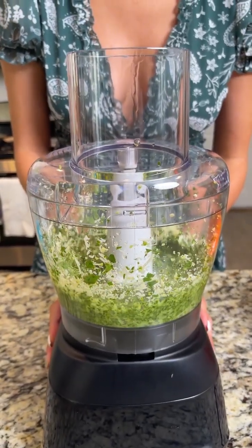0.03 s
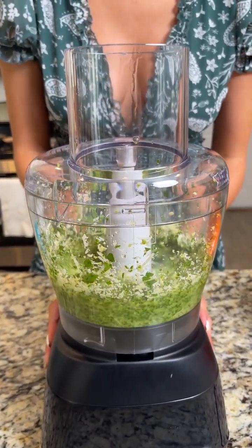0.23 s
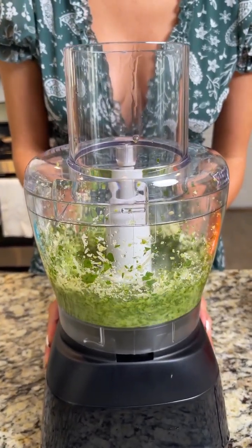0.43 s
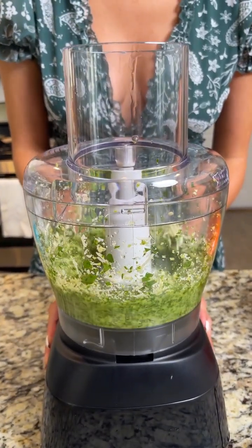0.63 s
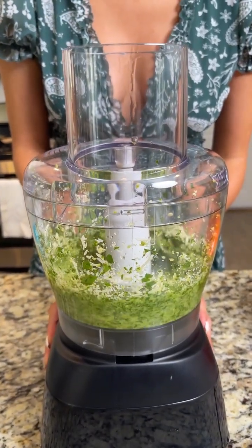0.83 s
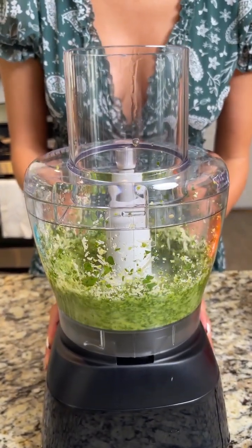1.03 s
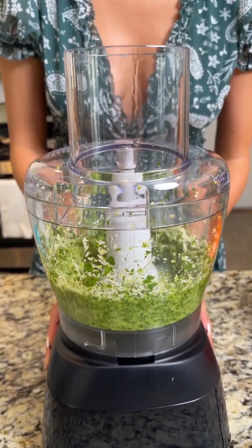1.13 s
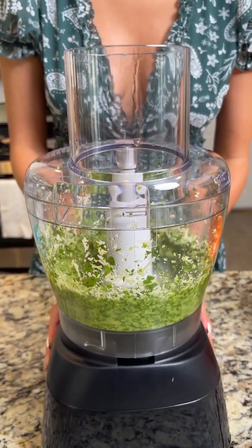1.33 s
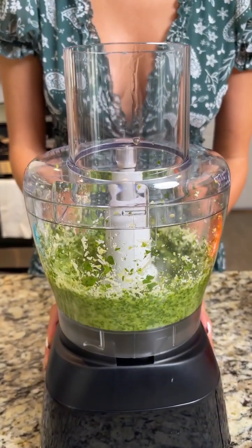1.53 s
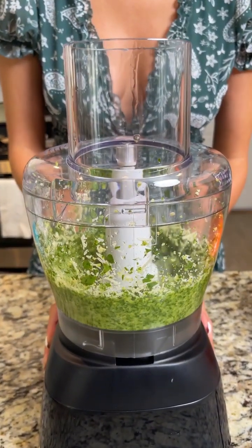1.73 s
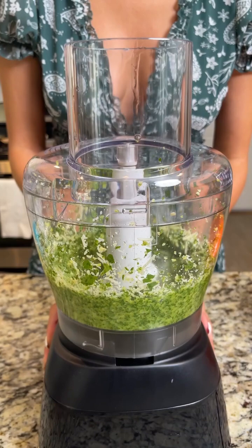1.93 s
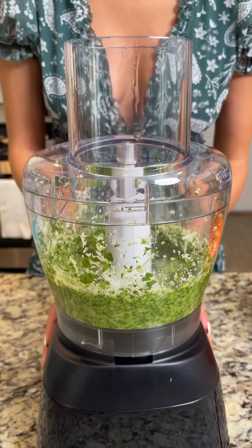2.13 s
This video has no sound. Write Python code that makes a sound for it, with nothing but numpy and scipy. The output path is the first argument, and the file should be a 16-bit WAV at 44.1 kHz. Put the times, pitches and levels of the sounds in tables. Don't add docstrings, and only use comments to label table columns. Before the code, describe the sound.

A food processor, heard close in stereo in a quiet kitchen. The tail of an earlier pulse fades until 0.15 s, when the motor kicks in with a surging hum. Its tone climbs until about 0.7 s amid plastic rattle, gear whine, airy hiss and bowl ringing, with a bright spatter near 0.33 s. Power cuts around 1.1 s; the pitch slides down, the base hums near 1.5 s, and herbs tick softly until about 2 s.

```python
import sys
import numpy as np
from scipy import signal
from scipy.fft import rfft, irfft
from scipy.io import wavfile
from scipy.ndimage import uniform_filter1d

SR = 44100
rng = np.random.default_rng(int(sys.argv[2]) if len(sys.argv) > 2 else 0)


def master(y):
    cut = np.clip(np.atleast_2d(y).T, -1, 1)
    pcm = np.round(cut * 32767)
    wavfile.write(sys.argv[1], SR, pcm.astype(np.int16))


def gain_from_db(level_db):
    decades = np.asarray(level_db, float) / 20
    return 10 ** decades


N = 97020
T = np.arange(N) / SR
HZ = np.arange(N + 1) * SR / (2 * N) + 1e-3
ON_S, OFF_S = .157, 1.12

# t/s, turns per second/Hz, level/dB
SHAFT_RUN = [(.27, 196, -36), (.31, 206, -22), (.348, 220, -31), (.385, 238, -22), (.43, 255, -30),
             (.5, 277, -28), (.575, 292, -29), (.6, 295, -40), (.63, 298, -33), (.66, 300, -46),
             (.725, 302, -35), (.76, 304, -46), (.9, 290, -42), (.955, 278, -31), (1, 280, -44),
             (1.08, 280, -44), (1.13, 268, -35), (1.258, 233.5, -25), (1.346, 202, -30), (1.372, 196, -43),
             (1.432, 179.6, -35), (1.475, 168, -39), (1.5, 162, -56), (1.65, 122, -52), (1.7, 112, -39),
             (1.78, 94, -44), (1.88, 71, -58)]
# f/Hz, width/Hz, level/dB
VENT_PEAKS = [(5900, 400, -5), (9320, 270, 7), (9850, 270, 8), (10220, 220, 9)]


def in_time(rows):
    s, *columns = np.transpose(rows)
    return [np.interp(T, s, column) for column in columns]


def at_hz(points):
    hz, db = np.transpose(points)
    octaves_below = np.maximum(np.log2(hz[0] / HZ), 0)
    octaves_above = np.maximum(np.log2(HZ / hz[-1]), 0)
    return gain_from_db(np.interp(np.log(HZ), np.log(hz), db) - 150 * (octaves_below + octaves_above))


def below(hz):
    return .5 - .5 * np.tanh((HZ - hz) / 25)


def rms_one(x):
    return x / np.sqrt(np.mean(x ** 2) + 1e-20)


def drift(rate_hz):
    r = np.exp(-2 * np.pi * rate_hz / SR)
    slow = signal.lfilter([1], [1, -2 * r, r * r], rng.standard_normal(2 * N))[N:]
    return rms_one(slow - slow.mean())


def fade_between(start, end, in_per_s, out_per_s):
    return np.clip(np.minimum((T - start) * in_per_s, (end - T) * out_per_s), 0, 1)


def resonance(hz, width):
    return 1 / (1 + (2 * (HZ - hz) / width) ** 2)


def rings(peaks, ring_db):
    power = sum(gain_from_db(2 * (db + ring_db)) * resonance(hz, width) for hz, width, db in peaks)
    return np.sqrt(1 + power)


def stereo_noise(colour, unevenness):
    # f/Hz, side minus mid/dB
    spread = [(60, -41), (270, -42.5), (580, -24), (1000, -7.5), (1400, -22.5), (2400, -4), (5600, -6.5),
              (11900, -4)]
    # f/Hz, left minus right/dB
    louder_left = [(60, 0.0), (130, 0.0), (270, 0.0), (650, 1.5), (1230, 0.2), (2630, -1.5), (5600, -1.0),
                   (11900, 0.0)]
    # f/Hz, lead of the left/radians
    left_lead = [(0, 0), (4050, -0.1), (4910, -3.2), (5600, -0.3), (6720, 0.4), (7750, 2.6), (8010, 0.1),
                 (12100, -0.1)]
    # f/Hz, width/Hz, depth/0-1
    cancelled = [(2801, 220, 0.62), (4287, 98, 1), (4880, 180, 0.8), (5210, 57, 0.2), (8150, 67, 0.3)]
    mid, side = rfft(rng.standard_normal((2, N)) * unevenness, 2 * N) * colour
    scale = np.sqrt(2 * N * N / np.sum(abs(mid) ** 2))
    for hz, width, depth in cancelled:
        mid = mid * (1 - np.clip(depth, 0, 1) * resonance(hz, width))
    side = side * at_hz(spread)
    level_lean = at_hz([(1e-4, 0.0064)] + list(louder_left) + [(SR, 0)]) ** .5
    lean = level_lean * np.exp(.5j * np.interp(HZ, *np.transpose(left_lead)))
    return scale * irfft([(mid + side) * lean, (mid - side) / lean])[:, :N]


def uneven(turns, depth, flicker_db, lurch_db):
    once_a_turn = 1 + np.clip(depth, 0, 1) * np.sin(2 * np.pi * turns)
    return once_a_turn * gain_from_db(flicker_db * drift(270) + lurch_db * drift(11.4))


def kitchen():
    # f/Hz, level per Hz/dB
    room_colour = [(18, -29), (30, -1), (149, 23), (321, -25), (1030, 2), (3710, -49), (4870, -50),
                   (9720, -41), (11000, -54), (14300, -84), (22000, -120)]
    return gain_from_db(-52.5) * stereo_noise(at_hz(room_colour), 1)


def starting():
    kick_db, spinup_s = -16, .024
    fading_db = -15.5 - 77 * T
    spinup_db = kick_db * np.clip(1 - (T - ON_S) / spinup_s, 0, 1)
    return gain_from_db(np.where(T > ON_S, spinup_db, fading_db))


def rumble(turns, effort_db):
    # f/Hz, level per Hz/dB
    rumble_colour = [(15, -60), (25, -30), (70, -14.5), (112, -1.5), (151, -10), (216, 3), (270, 0.5),
                     (408, -54), (600, -10.5), (780, -24.5), (1320, -120)]
    level = gain_from_db(-34.5 + 1.02 * (effort_db + 25))
    return level * stereo_noise(at_hz(rumble_colour), uneven(turns, 0, 0, 1.03))


def rattle(turns, effort_db):
    # f/Hz, level per Hz/dB
    rattle_colour = [(180, 0.5), (330, -8.5), (429, -7), (979, 0), (1380, -2), (1510, 2), (2000, -4),
                     (2600, -49), (4400, -120)]
    # f/Hz, width/Hz, level/dB
    bowl_peaks = [(1053, 33, -7.5), (1283, 16, -1), (1528, 60, -5.5), (1783, 28, -3.5), (1856, 32, -2)]
    colour = at_hz(rattle_colour) * rings(bowl_peaks, 7)
    return gain_from_db(-4 + effort_db) * stereo_noise(colour, uneven(turns, 0.037, 0.55, 0.96))


def gear_whine(turns, effort_db, whine_db):
    # f/Hz, level per Hz/dB
    whine_colour = [(1120, -20), (1900, -4), (2210, -1.5), (2520, -3), (2810, -3), (3400, -8), (4590, -3.5),
                    (5000, -4.5), (6500, -55), (11000, -120)]
    # f/Hz, width/Hz, level/dB
    housing_peaks = [(2174, 26, 11.5), (2280, 21, 10.5), (2483, 85, 10.5), (2589, 21, 8.5), (2852, 66, 6.5),
                     (3430, 42, 8.5)]
    level = gain_from_db(-2.5 + effort_db + whine_db) * gain_from_db(-6 * (T < ON_S))
    colour = at_hz(whine_colour) * rings(housing_peaks, 0.086)
    return level * stereo_noise(colour, uneven(turns, 0.13, 0.19, 0.68))


def hiss(turns, effort_db, bright_db):
    # f/Hz, level per Hz/dB
    hiss_colour = [(2350, -14), (4000, -1.5), (4610, -8), (5010, -5), (5910, -2), (7800, -1.5),
                   (9910, -5.5), (11000, -7), (12300, -10), (16000, -47), (22000, -120)]
    level = gain_from_db(-3 + effort_db + 0.86 * bright_db) * gain_from_db(-8.5 * (T < ON_S))
    colour = at_hz(hiss_colour) * rings(VENT_PEAKS, 0.11)
    return level * stereo_noise(colour, uneven(turns, 0.075, 0.96, 0.93))


def fan_air(x):
    # start/s, end/s
    air_gaps = [
        (-1, .15),
        (.2, .295),
        (.335, .51),
        (1.31, 1.355),
        (1.565, 1.625),
        (1.75, 1.775),
        (1.85, 1.94),
        (2.06, 2.3),
    ]
    fade_db_per_s = -8
    dull = irfft(rfft(x, 2 * N) * below(11100))[:, :N]
    shut = uniform_filter1d(sum(1. * (T > start) * (T < end) for start, end in air_gaps), size=400)
    thinning = gain_from_db(fade_db_per_s * np.maximum(T - OFF_S, 0))
    return dull + (1 - shut) * thinning * (x - dull)


def hum():
    # f/Hz, running level/dB, switch-on level/dB
    hum_tones = [
        (119, -40, -32),
        (238, -48, -23),
    ]
    inrush_s, rise_s, sag = .07, .02, .12
    since_on = np.maximum(T - ON_S, 0)
    powered = np.clip(since_on / rise_s, 0, 1) * np.clip((OFF_S - T) * 8, 0, 1)
    surge = np.exp(-(since_on / inrush_s) ** 4)
    sagging_time = np.cumsum(1 + sag * (.5 - since_on / inrush_s)) / SR
    out = 0
    for hz, run_db, inrush_db in hum_tones:
        running = gain_from_db(run_db + 5.3 * drift(6.3)) * np.sin(2 * np.pi * hz * T)
        inrush = gain_from_db(inrush_db) * np.sin(2 * np.pi * hz * sagging_time)
        out = out + running * (1 - surge) + inrush * surge
    return powered * out


def thin_high_tone():
    # start/s, end/s, f/Hz
    start, end, hz = (.19, .51, 11542)
    level = gain_from_db(-41 + 2 * drift(23)) * fade_between(start, end, 100, 100)
    return level * np.sin(2 * np.pi * hz * T)


def swells(rows, colour):
    shape = sum(gain_from_db(db) * np.exp(-.5 * ((T - s) / length) ** 2) for s, db, length in rows)
    return shape * stereo_noise(colour, 1)


def bowl_singing():
    # t/s, level/dB
    sweeps = [(0.218, -32.5), (.41, -27), (.49, -23.5), (.58, -34), (.79, -32), (.87, -28.5), (.94, -32),
              (1.07, -34), (1.19, -35.5), (1.31, -32), (1.35, -41), (1.44, -37), (1.53, -48), (1.575, -37),
              (1.69, -43)]
    sweep_s = 0.015
    return swells([(s, db, sweep_s) for s, db in sweeps], resonance(1545, 48))


def scraps():
    # t/s, peak level/dB
    hits = [(0.2614, -38.5), (0.3344, -8), (1.5794, -21), (1.632, -24), (1.682, -20), (1.793, -25),
            (1.810, -26), (1.8244, -25), (1.848, -29), (1.980, -35), (1.9944, -32), (2.033, -22),
            (2.041, -27)]
    t60_s = .045
    shape = sum(gain_from_db(db - 17 - 60 * np.maximum(T - s, 0) / t60_s) * (T >= s) for s, db in hits)
    return shape * stereo_noise(1 / np.sqrt(1 + ((HZ - 6600) / 1800) ** 4), 1)


def vents_shrilling():
    # t/s, level/dB, length/s
    shrills = [
        (.27, -30, 0.018),
        (.335, -27.5, 0.033),
        (.6, -51, .04),
        (.83, -33.5, .03),
        (1.13, -33, 0.038),
        (1.25, -34.5, 0.026),
        (1.325, -31.5, 0.029),
        (1.45, -40, 0.049),
        (1.59, -41.5, 0.027),
        (1.69, -45, 0.02),
    ]
    ringing_only = np.sqrt(rings(VENT_PEAKS[1:], 0) ** 2 - 1)
    return swells(shrills, ringing_only * below(9900) * (1 - below(8100)))


def shaft(turns, hz, level_db):
    # times the shaft speed, level/dB
    overtones = [
        (2, -41),
        (3, -56),
    ]
    base_hz, base_width_hz = 232, 90
    level = gain_from_db(level_db + 3) * (1 + .1 * drift(12))
    out = level * np.sin(2 * np.pi * turns) * fade_between(SHAFT_RUN[0][0], SHAFT_RUN[-1][0], 50, 50)
    for order, db in overtones:
        near_base = 1 / (1 + (2 * (order * hz - base_hz) / base_width_hz) ** 2)
        wobble = 1 + .5 * drift(6.9)
        out = out + gain_from_db(db) * near_base * wobble * np.sin(2 * np.pi * order * turns) * (T > OFF_S)
    return out


def growl():
    # start/s, end/s
    start, end = (.58, 1.16)
    level = gain_from_db(-40.5 + 2.7 * drift(11.4)) * fade_between(start, end, 20, 20)
    return level * stereo_noise(1 / (1 + (2 * (HZ - 302) / 104) ** 4), 1)


def base_ring():
    # start/s, end/s
    start, end = (1.47, 1.695)
    level = gain_from_db(-33 + 2 * drift(56)) * fade_between(start, end, 20, 50)
    return level * np.sin(2 * np.pi * 226 * T)


def scene():
    # t/s, level/dB, share of gear whine/dB, brightness/dB
    effort = [(0.18, -28, -1.5, -9), (0.23, -21.5, -4, -6), (0.28, -22, -0.5, -2), (0.42, -21.5, 1, 1.5),
              (0.45, -24.5, 1, 0.5), (0.62, -21.5, 3, -1), (0.63, -27.5, 6, 4), (0.66, -25, -0.5, 2.5),
              (0.7, -26, 4, 1.5), (0.96, -26, 4.5, 3), (1.28, -29, -1.5, -4.5), (1.32, -29, -0.5, -3.5),
              (1.35, -32, 1, -2.5), (1.39, -31, -3.5, -5), (1.77, -37, -4.5, -5.5), (1.82, -38.5, -4.5, -6),
              (2.15, -40.5, -5, -15), (2.2, -43, -15, -22)]
    hz, level_db = in_time(SHAFT_RUN)
    effort_db, whine_db, bright_db = in_time(effort)
    turns = np.cumsum(hz) / SR
    machine = rumble(turns, effort_db) + rattle(turns, effort_db)
    machine = machine + gear_whine(turns, effort_db, whine_db) + hiss(turns, effort_db, bright_db)
    noises = starting() * machine + kitchen() + bowl_singing() + scraps() + vents_shrilling() + growl()
    tones = hum() + thin_high_tone() + shaft(turns, hz, level_db) + base_ring()
    return tones + fan_air(noises)


def dropouts(mid):
    # f/Hz, width/Hz, share of the time/0-1
    bands = [(2800, 100, .25), (3150, 120, .06), (4330, 130, .15), (4880, 170, .5), (5170, 170, .3),
             (5450, 180, .3), (6800, 150, .1), (7200, 150, .08), (7620, 150, .22)]
    out = irfft(mid)[:N]
    for hz, width, share in bands:
        chance = drift(7)
        gone = uniform_filter1d(1. * (chance < np.quantile(chance, share)), size=700)
        band = below(hz + width / 2) * (1 - below(hz - width / 2))
        out = out - gone * irfft(mid * band)[:N]
    return out


def roll_off(x):
    return signal.sosfilt(signal.butter(12, 12520, fs=SR, output="sos"), x)


def record(dry):
    # low/Hz, high/Hz, side level/dB
    same_bands = [
        (-99, 200, -8),
        (1380, 2020, -60),
        (5900, 6600, -60),
        (8000, 9600, -12),
    ]
    left, right = rfft(dry, 2 * N) * below(12110)
    mid = dropouts((left + right) / 2)
    side_db = sum(db * below(high) * (1 - below(low)) for low, high, db in same_bands)
    side = irfft((left - right) / 2 * gain_from_db(side_db))[:N]
    return roll_off(np.array([mid + side, mid - side]))


dry = scene()
out = record(dry)
master(out)
```